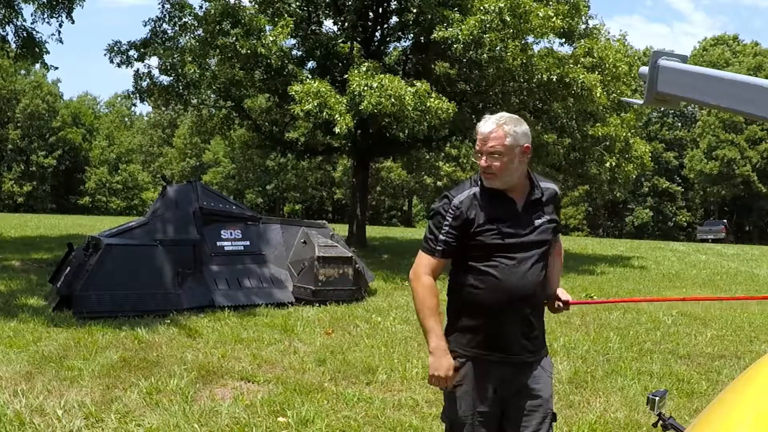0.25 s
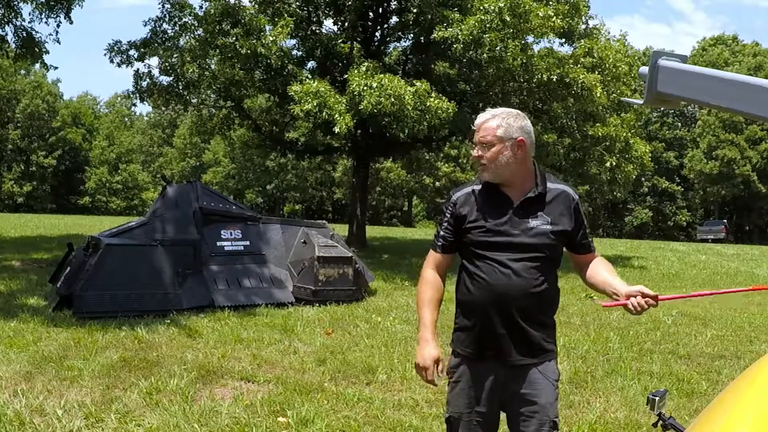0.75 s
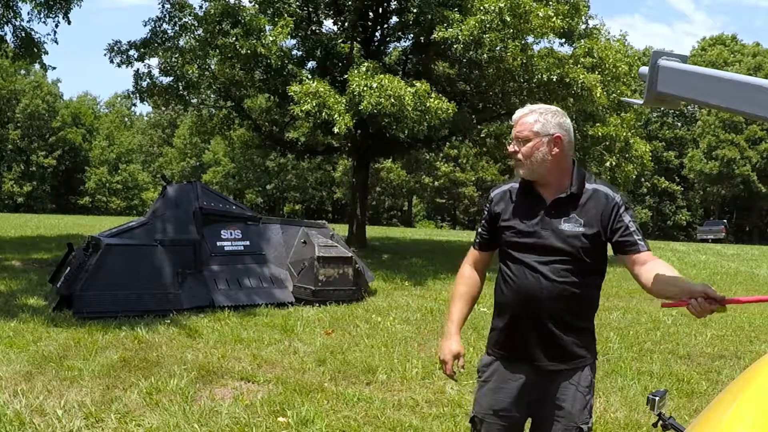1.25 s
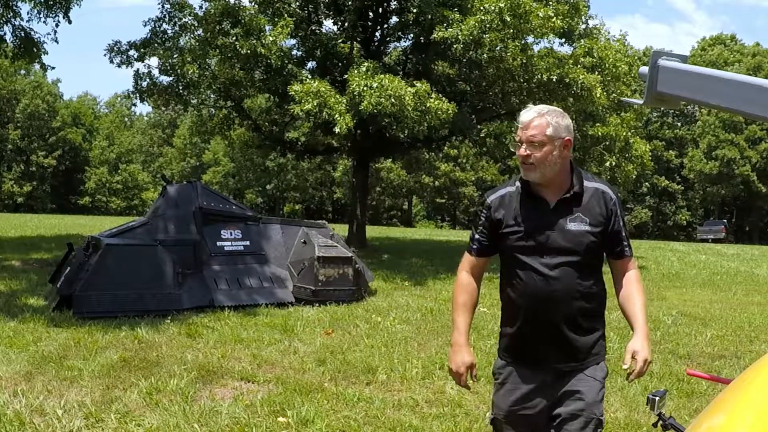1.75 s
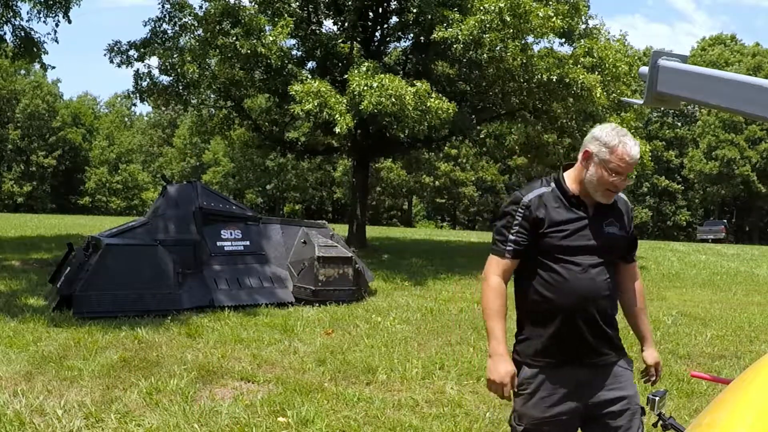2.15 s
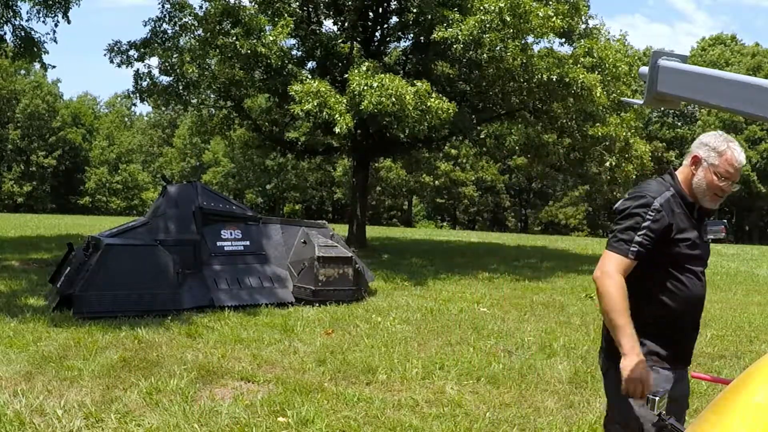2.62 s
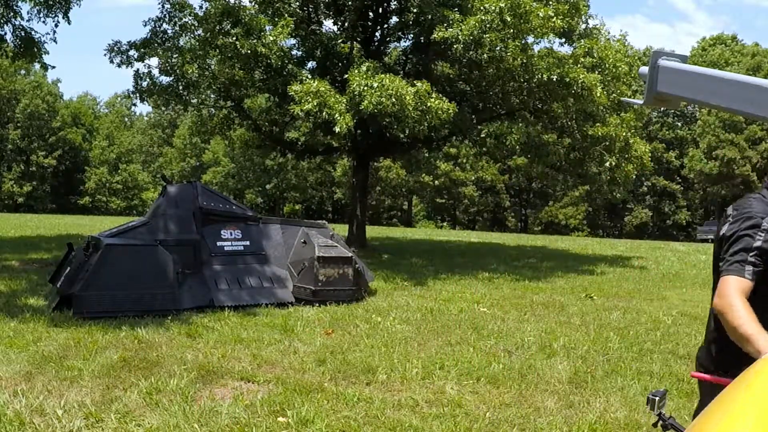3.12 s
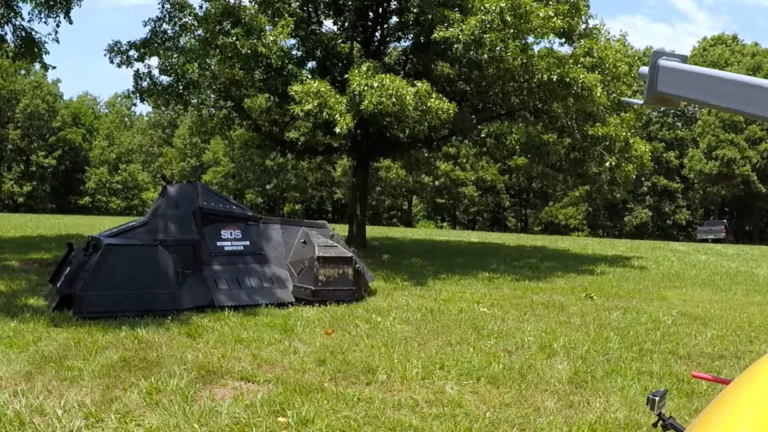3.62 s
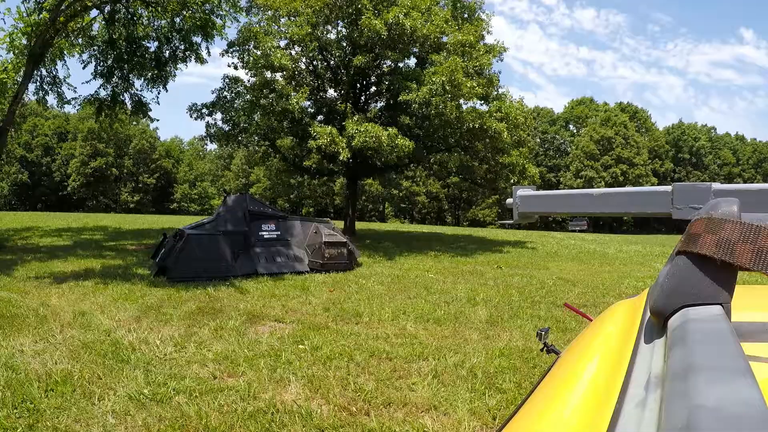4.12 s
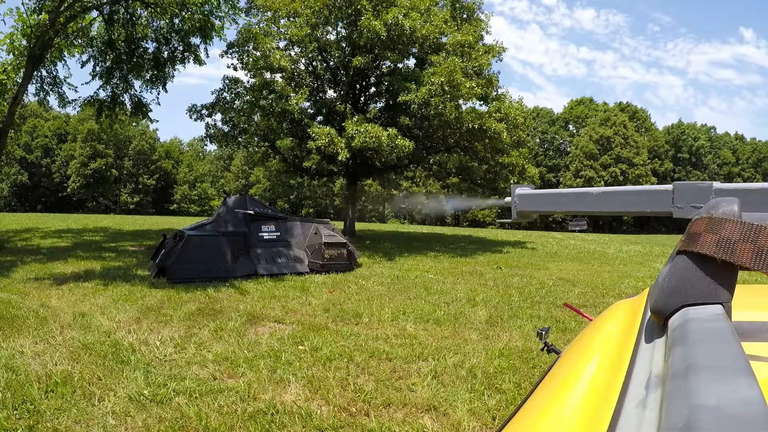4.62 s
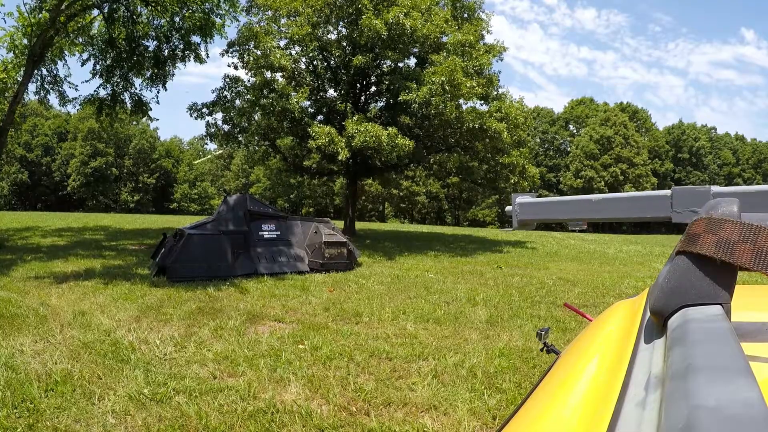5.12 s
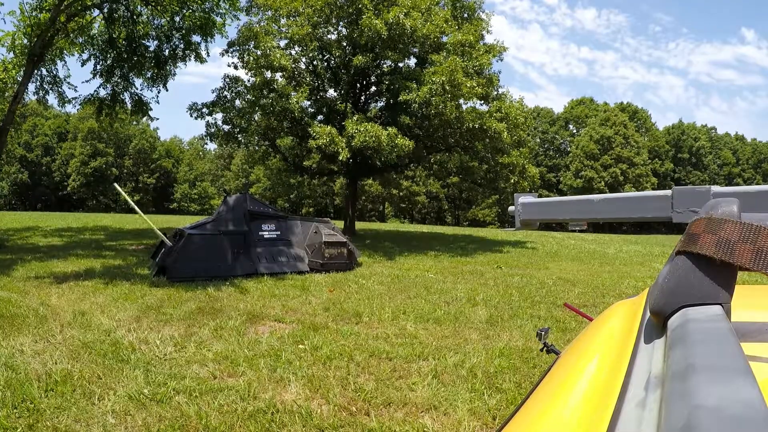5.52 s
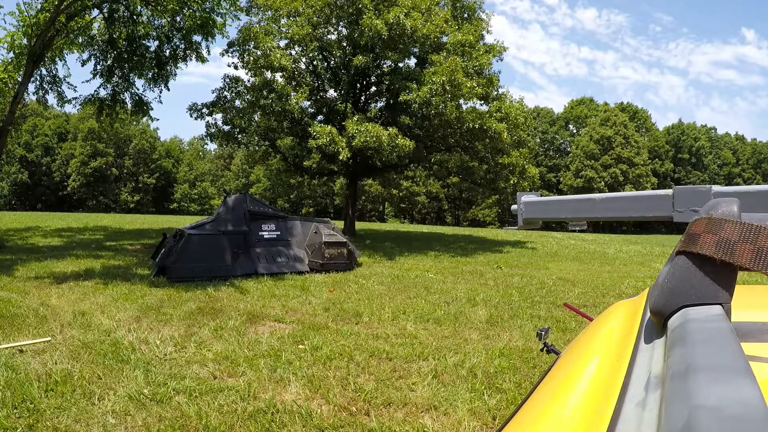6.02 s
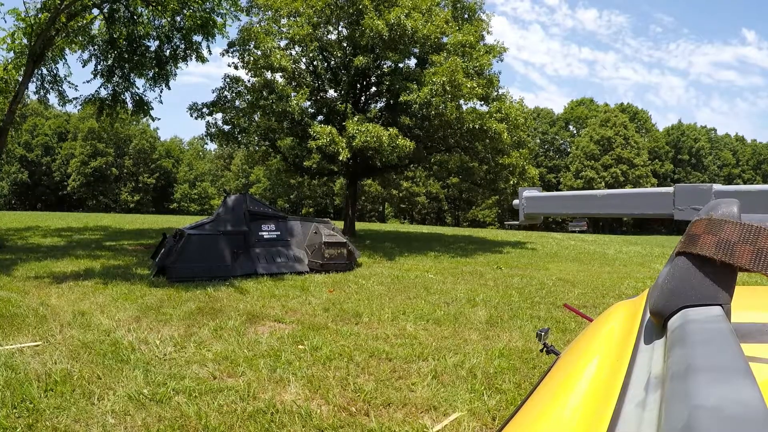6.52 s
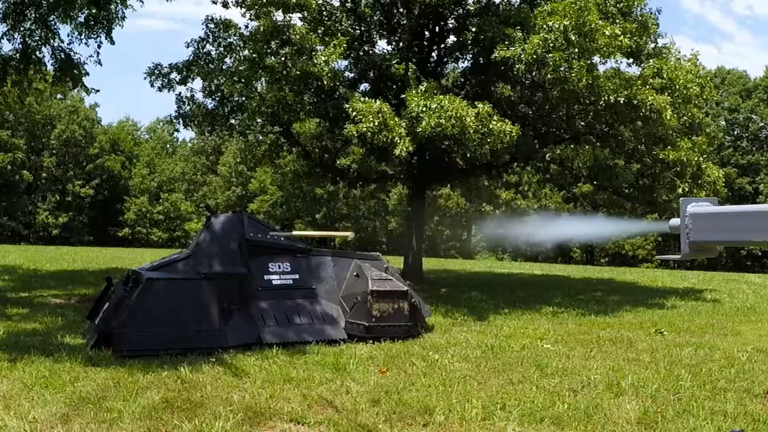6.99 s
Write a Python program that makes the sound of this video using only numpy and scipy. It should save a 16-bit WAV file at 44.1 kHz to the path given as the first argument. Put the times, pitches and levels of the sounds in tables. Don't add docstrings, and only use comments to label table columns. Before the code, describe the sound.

A small engine idles in an open field, then compressed air hisses, a sharp double pop cracks, a board slams steel, and a splinter clanks metal.

```python
import sys
import numpy as np
from scipy import signal
from scipy.fft import rfft, irfft, next_fast_len
from scipy.io import wavfile

SR = 44100
rng = np.random.default_rng(int(sys.argv[2]) if len(sys.argv) > 2 else 0)


def master_out(mix):
    frames = np.transpose(np.atleast_2d(mix))
    ceiling = np.clip(frames, -1, 1)
    pcm = np.round(ceiling * 32767).astype(np.int16)
    wavfile.write(sys.argv[1], SR, pcm)


def voltage_ratio(decibels):
    exponent = np.asarray(decibels, float) / 20
    return 10 ** exponent


N = 319813

CHANGE_S, END_S = 4.0368, 7.0063
EXHAUST_DB = -15.5
VALVE_OPENS_S, VALVE_ATTACK_S = 4.373, 0.01
# (time [s], peak level [dB], ring frequency [Hz], t60 [s])
MUZZLE_POPS = [
    (4.5062, -5, 620, 0.008),
    (4.5430, 0, 640, 0.008),
]


def rms_one(x):
    return x / np.sqrt(np.mean(x ** 2) + 1e-20)


def drift(rate):
    r = np.exp(-80 * np.pi * rate / SR)
    slow = signal.lfilter([1], [1, -2 * r, r * r], rng.standard_normal(N // 40 + 2002))[2000:]
    return np.interp(np.arange(N) / 40, np.arange(len(slow)), rms_one(slow))


def coloured(spectrum):
    size = next_fast_len(N)
    hz, db = np.transpose(spectrum)
    log_hz = np.log(np.fft.rfftfreq(size, 1 / SR) + 1)
    shape = voltage_ratio(np.interp(log_hz, np.log(hz), db, -90, -90))
    return rms_one(irfft(rfft(rng.standard_normal(size)) * shape, size)[:N])


def band(x, low_hz, high_hz):
    return signal.sosfilt(signal.butter(2, [low_hz, high_hz], "band", fs=SR, output="sos"), x)


def clicks(times, db):
    out = np.full(N, 1e-18)
    out[np.round(np.asarray(times) * SR).astype(int)] = voltage_ratio(np.asarray(db))
    return out


def ring(x, hz, t60):
    r, w = voltage_ratio(-60 / (t60 * SR)), 2 * np.pi * hz / SR
    return signal.lfilter([0, np.sin(w)], [1, -2 * r * np.cos(w), r * r], x)


def struck(times, db, modes, spread_db):
    chance = rng.standard_normal((len(times), len(modes)))
    out = 0
    for k, (hz, mode_db, t60) in enumerate(modes):
        out = out + ring(clicks(times, db + mode_db + spread_db * chance[:, k]), hz, t60)
    return out


def burst(times, db, t60, low_hz, high_hz):
    fading = signal.lfilter([1], [1, -voltage_ratio(-60 / (t60 * SR))], clicks(times, db))
    return fading * rms_one(band(rng.standard_normal(N), low_hz, high_hz))


def engine():
    idle_hz, idle_after_hz = 27.19, 27.0
    rumble_db, fan_db = -24.5, -42.5
    # (multiple of the cycle rate, level [dB])
    exhaust = [(1, -9), (2, 0.5), (3, -34), (4, -14.5), (5, -6), (6, -12), (7, -18), (8, -6.5), (9, -12.5),
               (10, -19), (11, -19.5), (12, -15), (13, -18.5), (14, -23), (15, -12.5), (16, -22), (17, -19),
               (18, -21), (19, -22), (20, -21.5), (21, -21), (22, -27.5), (23, -23), (24, -27.5), (25, -28)]
    # (frequency [Hz], spectral density [dB per Hz])
    rumble = [(20, -29), (40, -13.5), (80, -2.5), (130, -6.5), (220, -6), (420, -1), (560, -4), (680, -8),
              (900, -7.5), (1100, -28), (1400, -41)]
    # (frequency [Hz], spectral density [dB per Hz])
    fan_before = [(590, -29), (1000, -8), (1050, -11), (1170, -4), (1350, -19.5), (1630, -7.5),
                  (1720, -16.5), (1890, -9.5), (1950, -14), (3110, -19.5), (3820, -29.5), (5920, -22.5),
                  (7520, -30.5), (8690, -40.5), (12000, -47.5), (15600, -81), (22000, -120)]
    # (frequency [Hz], spectral density [dB per Hz])
    fan_after = [(590, -26.5), (1000, -2), (1080, -5), (1270, -14.5), (1310, -14), (1560, -11),
                 (2140, -17.5), (3480, -23), (4110, -32), (5980, -25.5), (7520, -34), (8690, -45.5),
                 (10300, -46), (11200, -55), (12000, -50), (15600, -79), (22000, -120)]
    before = np.arange(N) < CHANGE_S * SR
    cycles = np.cumsum(np.where(before, idle_hz, idle_after_hz)) / SR
    phase = 2 * np.pi * (cycles + 0.003 * drift(8.3))
    slip = rng.standard_normal(len(exhaust))
    orders = 0
    for (k, db), chance in zip(exhaust, slip):
        sign = -1 if k == 1 else 1
        waver_db = (0.5 + 0.11 * k) * drift(3.96)
        lag = 2.83 * k + 0.023 * k * k - 0.5 + chance * np.clip(0.4 * (k - 8), 0.15, 3)
        orders = orders + sign * voltage_ratio(db + waver_db) * np.cos(k * phase - lag)
    turbulence = voltage_ratio(rumble_db + 1.0 * drift(27)) * coloured(rumble)
    fan = np.where(before, coloured(fan_before), voltage_ratio(4.0) * coloured(fan_after))
    return voltage_ratio(EXHAUST_DB) * orders * np.sqrt(2) + turbulence + voltage_ratio(fan_db + 0.48 * drift(25)) * fan


def second_machine():
    throb_hz, throb_db = 21.85, -29.5
    # (frequency [Hz], bandwidth [Hz], level [dB])
    casing = [(750, 50, 0), (520, 120, -9), (950, 90, -12), (1620, 50, -22), (1850, 40, -23)]
    turns = np.arange(1, int(throb_hz * END_S))
    chance = rng.standard_normal((len(turns), 2))
    knocks = clicks(turns / throb_hz + 0.004 + 0.001 * chance[:, 0], 1.5 * chance[:, 1])
    puffs = signal.lfilter([1], [1, -voltage_ratio(-60 / (0.05 * SR))], knocks) * rng.standard_normal(N)
    blows = band(band(knocks + 0.04 * puffs, 550, 1000), 550, 1000)
    drive = blows + 0.008 * rng.standard_normal(N)

    def body(pitch):
        return rms_one(sum(voltage_ratio(db) * np.sqrt(width) * ring(drive, hz * pitch, 2.2 / width)
                           for hz, width, db in casing))

    return voltage_ratio(throb_db) * np.where(np.arange(N) < CHANGE_S * SR, body(1), voltage_ratio(-6.0) * body(1.13))


def tank():
    # (time [s], peak level [dB], crack level [dB], hum level [dB])
    tank_knocks = [
        (1.424, -27, -13, 8),
        (1.455, -36, -30, 17),
        (1.545, -36, -30, 19),
        (6.289, -9, -18, -16),
        (6.2915, -3.5, -25, -20),
        (6.300, -19, -15, -12),
        (6.313, -22, -14, -12),
    ]
    # (frequency [Hz], level [dB], t60 [s])
    wall_modes = [(404, -3, .05), (560, -3, .08), (670, -1, .24), (800, -1, .06), (899, -3, .13),
                  (1712, -17, .07), (2300, -23, .12), (3120, -27, .12), (3340, -22, .09), (5600, -30, .05),
                  (6900, -25, .05)]
    # (frequency [Hz], level [dB], t60 [s])
    mount_modes = [(187.5, -9, 0.96), (197, -5.5, 0.18), (284, -7, 0.97), (445, 6.5, 0.081),
                   (700, -22, 0.5)]
    s, db, crack_db, hum_db = np.transpose(tank_knocks)
    crack = band(burst(s, db + crack_db, 0.06, 1000, 4000), 900, 7000)
    crack = crack + band(burst(s, db + crack_db - 8, 0.04, 3500, 8000), 3000, 9000)
    rod_s, rod_db, rod_hz, rod_t60 = 1.424, -32, 1550, 0.1
    rod = band(burst([rod_s], [rod_db], rod_t60, rod_hz * 0.88, rod_hz * 1.12), 1200, 2000)
    wall = band(struck(s, db - 6.5, wall_modes, spread_db=2.0), 200, 8000)
    wall = wall + band(burst(s, db - 10, 0.05, 500, 1000), 400, 1300)
    return wall + crack + rod, struck(s, db + hum_db, mount_modes, spread_db=1)


def valve():
    full_flow_s, half_flow_s, step_s, shut_s, dregs_s = 0.092, 0.12, 0.035, 0.02, 0.08
    jet_db, half_db, dregs_db = -21.5, -9.5, -23.5
    t = np.arange(N) / SR
    stages_s = [0, VALVE_ATTACK_S, full_flow_s, step_s, half_flow_s - step_s, shut_s, dregs_s]
    times = VALVE_OPENS_S + np.cumsum(stages_s)
    flow_db = jet_db + np.array([dregs_db, 0, 0, half_db, half_db, dregs_db, dregs_db])
    hiss_db = np.interp(t, times, flow_db, -150, -150)
    since_pop = np.maximum(t - MUZZLE_POPS[-1][0], 0)
    roar_db = -30 - 12 * np.minimum(since_pop / 0.025, 1) - 43 * since_pop
    opening_db = dregs_db * np.clip(1 - (t - times[0]) / VALVE_ATTACK_S, 0, 1)
    return hiss_db, np.where(hiss_db > -150, roar_db + opening_db, -150)


def jet():
    # (frequency [Hz], spectral density [dB per Hz])
    jet_colour = [(1290, -40), (2200, -10), (2370, -15), (2490, -52), (2590, -16), (2680, -13), (3370, -3),
                  (4790, -7), (5740, 0), (7770, -10), (8790, -19), (9860, -9), (11200, -17), (14500, -17),
                  (15600, -30)]
    hiss_db, roar_db = valve()
    t, white, edges_hz = np.arange(N) / SR, coloured(jet_colour), np.geomspace(1500, 15000, 16)
    fading_db = -3 - 90 * np.clip(t - VALVE_OPENS_S, 0, 0.4)
    patchy = 0
    for low, high in zip(edges_hz, edges_hz[1:]):
        patch_db = 1.0 * drift(20) + fading_db * (low / 14000) ** 3
        patchy = patchy + voltage_ratio(patch_db) * band(white, low, high)
    roar = voltage_ratio(roar_db) * rms_one(band(rng.standard_normal(N), 750, 2000))
    leak = rms_one(band(band(rng.standard_normal(N), 8000, 14000), 8000, 14000))
    leak = voltage_ratio(-59.5) * leak * (t > CHANGE_S) * (t < VALVE_OPENS_S + VALVE_ATTACK_S)
    return voltage_ratio(hiss_db - 1.0) * rms_one(patchy) + roar + leak


def whistles():
    # (time [s], level [dB], frequency [Hz], t60 [s])
    tones = [
        (4.379, -21, 3620, 0.1),
        (4.55, -36, 3500, .2),
        (4.9, -60, 4080, 4.0),
        (4.8, -56, 1300, 4.0),
    ]
    return sum(band(burst([s], [db], t60, hz * 0.95, hz * 1.05), hz * 0.9, hz * 1.1)
               for s, db, hz, t60 in tones)


def muzzle():
    swings = 0
    for s, db, hz, t60 in MUZZLE_POPS:
        unit_peak = 2 * np.e * np.log(1000) / (t60 * SR)
        swings = swings + ring(ring(clicks([s], [db]), hz, t60), hz, t60) * unit_peak
    s, db = MUZZLE_POPS[-1][:2]
    front = band(burst([s + 0.00016], [db - 10.5], 0.0096, 650, 4300), 700, 4500)
    return band(swings, 100, 3000) + front


def shelter():
    # (time [s], peak level [dB], crack level [dB])
    slams = [
        (4.690, -11, -15),
        (4.7385, -6.5, -28.5),
        (4.747, -3, -46.5),
        (4.757, -12.5, -40),
        (4.778, -17.5, -42),
        (4.799, -18, -47),
    ]
    # (frequency [Hz], level [dB], t60 [s])
    panel_modes = [(106, 5.5, 0.9), (352, 1, 0.29), (480, -21.5, 0.36), (676, -1, 0.28),
                   (1066, -27.5, 0.15), (1173, -28, 0.53), (1290, -36.5, 6.1), (1425, -24, 0.41),
                   (1620, -31, 0.23), (1850, -19.5, 0.16), (1800, -13.5, 0.052), (2050, -45, 0.28),
                   (2230, -16.5, 0.02)]
    s, db, crack_db = np.transpose(slams)
    damped = [(hz, mode_db, min(t60, 0.11)) for hz, mode_db, t60 in panel_modes]
    panels = band(struck(s, db - 8.5, damped, spread_db=1.5), 70, 2300)
    rattle = band(burst(s, db - 14, 0.16, 250, 850), 150, 950)
    rattle = rattle + band(burst(s, db - 14, 0.25, 80, 250), 65, 400)
    scatter = band(burst(s[:2], db[:2] + [-31, -40], 0.59, 2200, 7500), 1500, 7400)
    crack = band(burst(s - 0.002, db + crack_db - 1, 0.035, 2800, 8300), 2700, 6900)
    slap = burst(s, db - 24.5 - 200 * np.maximum(s - s[1], 0), 0.017, 1200, 2400)
    return scatter + panels + rattle + crack + slap


def trees():
    echo_s, hold_s, peak_db, rise_db_per_s, fall_db_per_s = 5.49, 0.13, -45, 150, 135.5
    # (frequency [Hz], spectral density [dB per Hz])
    echo_colour = [(2800, -30), (3250, -10), (3450, 0), (4050, -1), (4400, -10), (5300, -12), (5900, -7),
                   (6500, -12), (7600, -16), (8000, -40), (9700, -24), (11000, -32), (12200, -24),
                   (13200, -50)]
    t = np.arange(N) / SR
    swell_db = peak_db - rise_db_per_s * np.maximum(echo_s - t, 0)
    swell_db = swell_db - fall_db_per_s * np.maximum(t - echo_s - hold_s, 0)
    skirt_db = np.where(abs(t - echo_s - hold_s / 2) < 0.2, -64.5, -150)
    return voltage_ratio(np.maximum(swell_db, skirt_db)) * coloured(echo_colour)


def ports(x, geometry, scatter_db):
    size = next_fast_len(N + 4096)
    hz = np.fft.rfftfreq(size, 1 / SR)
    lead = np.interp(hz, *np.transpose(geometry[0]))
    level_hz, level_db = np.transpose(geometry[1])
    tilt_db = np.interp(np.log(hz + 1), np.log(level_hz), level_db)
    ratio = voltage_ratio(tilt_db) * np.exp(1j * lead)
    side = (ratio - 1) / (ratio + 1 + 1e-9)
    side = side * np.minimum(1, 1.5 / (abs(side) + 1e-9))
    scatter = rng.standard_normal(2600) * voltage_ratio(-np.arange(2600) / 60)
    scatter = rfft(scatter / np.linalg.norm(scatter), size) * (hz / np.hypot(hz, 500)) ** 2
    faded_in = x * np.minimum(np.arange(N) / 600, 1)
    difference = irfft(rfft(faded_in, size) * (side + voltage_ratio(scatter_db) * scatter), size)[:N]
    return x + difference * [[1], [-1]]


def ducking(ducks, recovery_db_per_s):
    knee_db = 2.24
    loss = np.zeros(N)
    for s, depth_db, attack_s in ducks:
        since = np.maximum(np.arange(N) / SR - s, 0)
        onset = np.exp(-since / attack_s)
        pull = depth_db * (1 - onset) - recovery_db_per_s * since
        pull = np.where(since > 0, pull - knee_db * onset * 5, -99)
        loss = knee_db * np.logaddexp(loss / knee_db, pull / knee_db)
    return loss


def shelf(x, hz, gain_db):
    bass = signal.sosfiltfilt(signal.butter(1, hz, fs=SR, output="sos"), x)
    return bass + voltage_ratio(gain_db) * (x - bass)


def scene():
    # (time [s], depth [dB], attack [s])
    gain_ducks = [
        (4.372, 7, 0.086),
        (4.503, 7, .012),
        (4.538, 19.5, 0.015),
        (4.76, 18.5, 0.062),
        (6.288, 6, .008),
        (6.3, 20.5, .12),
    ]
    # (time [s], depth [dB], attack [s])
    treble_ducks = [
        (6.292, 34, 0.034),
    ]
    # (frequency [Hz], left-right level [dB])
    engine_side = [
        [(0, 0), (600, 0.0), (1380, 2.4), (1640, 1.0), (1890, 1.0), (2500, -1.0), (2930, 0.3), (5250, -2.0), (6120, -2.0), (7840, -2.4), (8870, -3.1), (10600, -3.2), (13700, -5.7), (15400, -6.4)],
        [(60, 0.0), (110, 0.0), (200, 0.0), (380, -1.0), (700, -5.0), (1290, -3.5), (2380, 0.0), (4400, -4.5), (8120, -2.5), (15000, -3.5)],
    ]
    # (frequency [Hz], left-right level [dB])
    barrel_side = [
        [(0, 0), (1380, 1.5), (1980, 0.4), (2410, -2.8), (3360, -5.6), (5340, -8.8), (6720, -8.5), (8100, -9.3), (9470, -9.5), (10100, -10.5), (10500, -10.5), (11300, -9.8), (11700, -6.3), (15400, -6.3)],
        [(60, 0.0), (110, 0.0), (200, 0.5), (380, -1.0), (700, -4.0), (1290, -3.0), (2380, -0.5), (4400, -4.5), (8120, -2.0), (15000, 0.0)],
    ]
    since_change = np.arange(N) / SR - CHANGE_S
    loss_db = ducking(gain_ducks, recovery_db_per_s=14)
    low_db = np.where(since_change < 0, -18.0, -13 - loss_db)
    treble_db = np.where(since_change < 0, -0.4, 1.7 + 0.13 * loss_db - 2.08 * since_change)
    machines = shelf(engine() + second_machine(), 900, treble_db)
    machines = shelf(machines, 166, -ducking(treble_ducks, recovery_db_per_s=149))
    machines = voltage_ratio(low_db - EXHAUST_DB) * machines
    wall, hum = tank()
    shot = jet() + whistles() + muzzle() + shelter() + trees() + wall
    out = ports(machines, engine_side, scatter_db=-6.5) + ports(shot, barrel_side, scatter_db=-6.5)
    return out + band(hum, 130, 900) * [[1.4], [0.5]]


def band_limit(x):
    return signal.sosfilt(signal.butter(12, 15830, fs=SR, output="sos"), x)


def record(dry):
    # (from [s], to [s], low edge [Hz], high edge [Hz])
    lost_bands = [
        (4.057, 4.38, 8150, 9450),
        (4.415, 5.65, 8100, 9300),
        (4.388, 4.478, 2430, 2590),
    ]
    t = np.arange(N) / SR
    start = np.minimum(0.3 + t / 0.002, 1)
    step = 0.33 * (t >= CHANGE_S) * np.exp(-np.maximum(t - CHANGE_S, 0) / 0.0039)
    x = 1.5 * np.tanh(dry / 1.5)
    centre = x.mean(axis=0)
    dropped = 0
    for begin, stop, low, high in lost_bands:
        notch = signal.butter(6, [low, high], "band", fs=SR, output="sos")
        gate = np.clip(np.minimum(t - begin, stop - t) / 0.004, 0, 1)
        dropped = dropped + signal.sosfiltfilt(notch, centre) * gate
    return band_limit((x - dropped + step) * (t < END_S) * start)


dry = scene()
out = record(dry)
master_out(out)
```